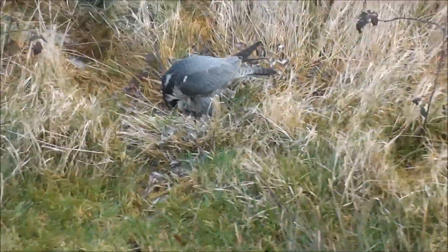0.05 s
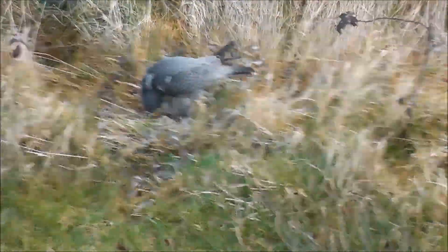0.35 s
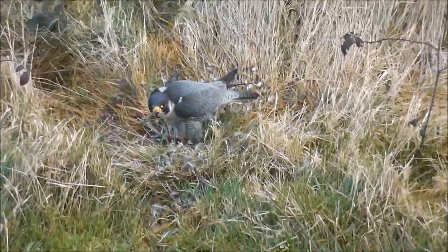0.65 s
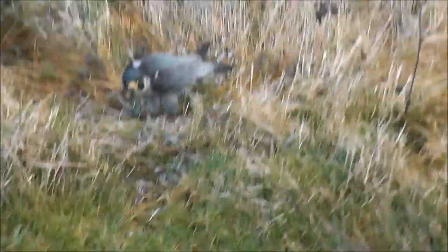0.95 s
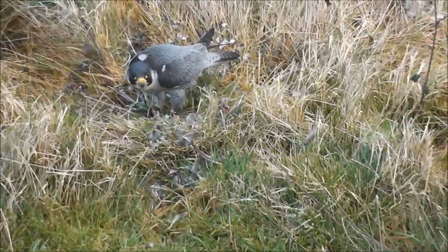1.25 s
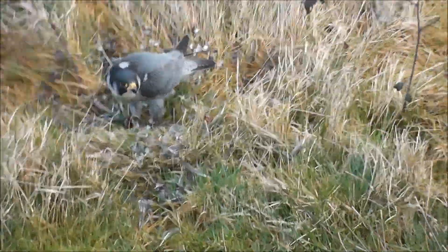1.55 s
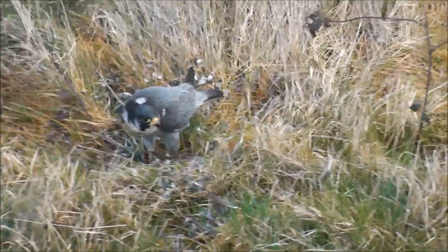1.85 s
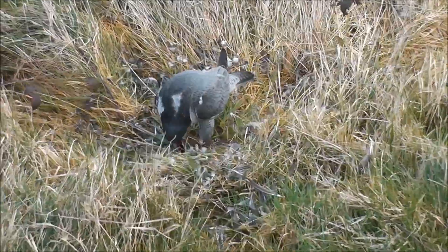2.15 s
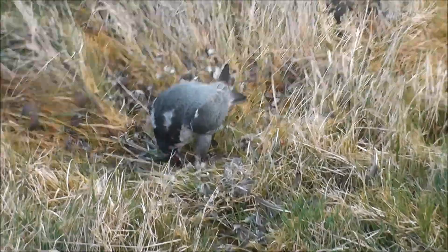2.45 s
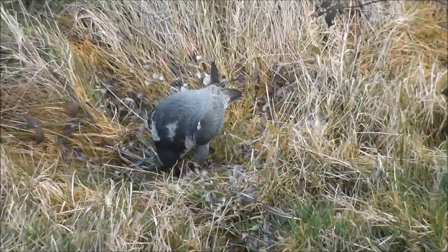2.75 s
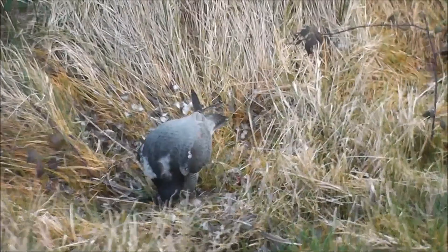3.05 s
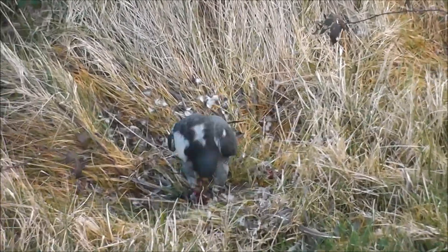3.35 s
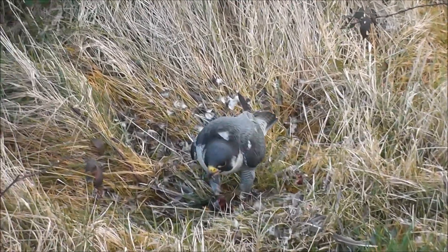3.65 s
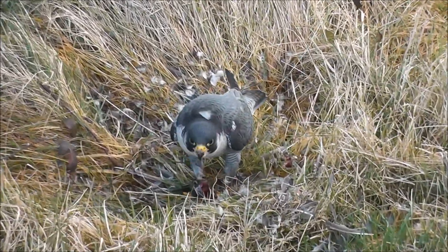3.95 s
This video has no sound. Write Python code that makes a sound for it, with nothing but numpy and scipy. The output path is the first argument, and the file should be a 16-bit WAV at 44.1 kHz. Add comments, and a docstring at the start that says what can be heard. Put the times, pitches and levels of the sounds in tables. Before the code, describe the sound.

Low wind buffets a hand-held microphone outdoors, with faint grass rustles. In a lull, a feeding falcon makes quiet snapping, tearing clicks and its little bell tinkles; then the wind pushes back in, thumping the microphone.

```python
"""Gusty wind buffets a hand-held microphone on a grassy slope, over the steady hiss of the open air.
From the first moments, soft swishes, probably grass or clothing, come at a slow walking pace, and a
falcon gives a stray dry snap and a tinkle of the little bell it wears. Just after 2 s the wind eases
and the bird plucks busily at its prey: fibres snap and tear, and the bell tinkles as it moves.
From about 3.3 s the gusts push back in, with a cluster of thumps near the end."""
import sys
import numpy as np
from scipy import signal
from scipy.fft import rfft, irfft
from scipy.io import wavfile
from scipy.ndimage import uniform_filter1d, minimum_filter1d

SR = 44100
rng = np.random.default_rng(int(sys.argv[2]) if len(sys.argv) > 2 else 0)


def pcm_store(signal):
    """Save signal as 16-bit PCM."""
    levels = np.round(np.clip(np.atleast_2d(signal), -1, 1) * 32767)
    wavfile.write(sys.argv[1], SR, levels.astype(np.int16).T)


N = 176400
T = np.arange(N) / SR

# Table levels are relative: each layer shapes and trims them further.
# fader ride of the open-air bed (time [s], level [dB])
AIR_RIDE = [(0, -45), (.35, -44.5), (.7, -42.5), (1.35, -42), (1.65, -38), (1.95, -38.5), (2.1, -40.5),
            (2.3, -39.5), (2.42, -36.5), (2.9, -38), (3.25, -35.5), (3.55, -39), (3.66, -41.5), (4, -44)]
# tone of the bed (frequency [Hz], level [dB])
AIR_EQ = [(200, -4.5), (600, 8.5), (1000, -6.5), (1300, -5.5), (1550, -7.5), (1930, 4), (2400, -9),
          (2900, -15), (3600, -21.5), (4400, -24), (5200, -18), (5800, -19), (6400, -26.5), (7400, -19),
          (8400, -27), (10000, -31), (12000, -34.5), (15500, -40)]
# stereo width of the bed (frequency [Hz], side over mid [dB])
AIR_WIDTH = [(300, -13), (1000, -8.5), (1900, -20), (2700, -3.5), (3500, 8.5), (4300, 1.5), (5300, -18.5),
             (7500, -7.5), (12000, -2.5)]
# the bed leans left (frequency [Hz], left over right [dB])
AIR_BALANCE = [(300, 5), (750, 2), (1130, 9.5), (1700, -0.5), (4000, 0.5)]
# faint narrow-band sounds: airy whistles and one brief scrape near 1.5 s
# (peak time [s], level [dB], half length [s], pitch [Hz])
NARROW_BAND_CUES = [(1.0, -63.5, 0.21, 3530), (1.474, -41, 0.024, 1870), (2.42, -35.5, 0.031, 2006),
                    (2.596, -55, 0.27, 3400)]
# soft brushing strokes (peak time [s], level [dB], rise [s], fall [s])
SWISH_CUES = [(.295, -48, 0.017, 0.018), (.385, -55, 0.013, 0.035), (.925, -46, 0.024, 0.033),
              (1.475, -47.5, .03, 0.096), (2.2, -42.5, 0.022, 0.04), (2.86, -44.5, 0.095, 0.1),
              (3.25, -52.5, 0.11, 0.15), (3.535, -40.5, 0.038, 0.034)]
# tone of the swishes (frequency [Hz], level [dB])
SWISH_EQ = [(600, -0.5), (1200, 9), (2000, 13), (3000, -3), (4300, -12), (5700, -4), (6500, -5.5),
            (7400, 3), (8100, -3.5), (8900, -4.5), (10000, -13.5), (11000, -20), (12000, -16.5),
            (13500, -21), (15500, -26.5)]
# stereo width of the swishes (frequency [Hz], side over mid [dB])
SWISH_WIDTH = [(1000, -3), (1900, -21.5), (2700, -10), (3500, 12.5), (4300, 9), (5300, -16), (7500, -8.5),
               (12000, 1)]
# modes of the bell's shell (frequency [Hz], level [dB], 60 dB decay time [s])
SHELL_MODES = [(3720, -16, 0.11), (7140, -3, 0.032), (7690, -13, .08), (10222, 0, 0.097), (10425, -18, .12),
               (10685, -23, .16)]
# clapper strikes (time [s], level [dB], low-mode boost [dB])
CLAPPER_CUES = [(.003, -59, 23), (.837, -43, 12.5), (1.36, -58, 0), (2.4608, -33.5, 5), (2.578, -56, -3),
                (2.6998, -36.5, -12), (2.759, -46, 12), (3.4223, -40.5, 11.5)]
# snaps of beak and dry stems
# (time [s], level [dB], body level [dB], body pitch [Hz], edge pitch [Hz], left over right [dB])
SNAP_CUES = [(0.5402, -34, 2, 1650, 6160, -5), (1.86, -47, 19, 1850, 3800, 1),
             (2.390, -23.5, 14, 1490, 4100, -1.5), (2.5327, -32, -6, 1650, 7450, -4),
             (2.723, -33.5, 6, 1750, 5600, 7), (2.8998, -34, -14, 1650, 7300, 1.5),
             (3.0216, -33, 10, 1400, 7500, 9), (3.114, -34, -10, 1650, 7700, 4),
             (3.133, -44, 27, 1080, 3500, 6), (3.154, -25.5, 2, 1680, 7250, 3),
             (3.3047, -28, 8.5, 1700, 10700, -5), (3.3656, -32, 8, 1650, 8500, -6),
             (3.377, -31.5, -3, 1650, 7500, 0)]
# single eddies thumping the microphone (time [s], level [dB], half length [s])
BUFFET_CUES = [(0.487, -6, 0.00063), (0.789, -8.5, 0.00086), (1.265, -6.5, 0.00098), (1.555, -13, 0.0014),
               (1.658, -6.5, .0009), (3.6253, 0, 0.00098), (3.659, 3, 0.0012), (3.6946, -2, 0.0013),
               (3.8406, -0.5, 0.0011)]
# gusts in the low rumble (time [s], level [dB])
RUMBLE_RIDE = [(0.0, -12.5), (0.11, -15.5), (0.19, -9), (0.29, -17), (0.4, -11), (0.59, -20.5), (0.61, -13),
               (0.88, -15.5), (0.93, -18), (1.0, -13), (1.08, -20.5), (1.14, -14), (1.6, -25.5),
               (1.66, -18.5), (1.99, -15.5), (2.04, -26), (2.26, -34), (2.39, -26.5), (2.44, -33.5),
               (2.48, -24), (2.55, -19.5), (2.58, -25), (3.02, -17.5), (3.13, -32.5), (3.2, -25.5),
               (3.23, -20.5), (3.25, -26), (3.29, -15.5), (3.38, -10.5), (3.41, -20), (3.58, -23.5),
               (3.63, -12.5), (3.7, -17.5), (3.72, -22), (3.84, -9.5), (3.87, -20.5), (3.91, -24.5),
               (3.95, -17.5), (4.0, -20.5)]
# tone of the rumble (frequency [Hz], level [dB])
RUMBLE_EQ = [(20, -45), (32, -37), (50, -11.5), (80, -3.5), (125, 1.5), (200, -1), (280, -5.5), (400, -13),
             (600, -22.5), (1000, -44), (2500, -83.5)]
# gusts in the brighter flutter (time [s], level [dB])
FLUTTER_RIDE = [(0.0, -17.5), (0.11, -14), (0.15, -17), (0.25, -17), (0.29, -19.5), (0.39, -21.5),
                (0.48, -17.5), (0.55, -24.5), (0.72, -19.5), (1.49, -36), (1.545, -28.5), (1.59, -45),
                (1.66, -26), (1.74, -24.5), (1.85, -24), (1.91, -30), (1.97, -23), (2.03, -46), (2.85, -36),
                (3.26, -47), (3.29, -22.5), (3.4, -23.5), (3.42, -34), (3.61, -28), (3.65, -24),
                (3.73, -34), (3.81, -23.5), (3.88, -36), (4.0, -31)]
# tone of the flutter (frequency [Hz], level [dB])
FLUTTER_EQ = [(120, -23.5), (250, -1.5), (420, 0.5), (560, -6), (760, -11), (1000, -21), (1400, -24),
              (2200, -35.5), (4000, -60.5), (11000, -74)]


def undb(db):
    """Decibels to gain."""
    return 10 ** (np.asarray(db) / 20)


def fader(ride):
    """Gain over time from (time [s], level [dB]) points."""
    return undb(np.interp(T, *np.array(ride).T))


def eq_curve(points):
    """Gain at every spectral bin from (frequency [Hz], level [dB]) points."""
    hz, db = np.array(points).T
    bin_hz = np.arange(N // 2 + 1) * SR / N
    return undb(np.interp(np.log(bin_hz + 1), np.log(hz), db))


def noise(eq):
    """Noise coloured by an EQ curve, rms 1."""
    x = irfft(rfft(rng.standard_normal(N)) * eq_curve(eq), N)
    return x / x.std()


def wander(rate_hz):
    """Smooth random modulation, standard deviation 1."""
    x = np.interp(T * rate_hz, np.arange(4096), rng.standard_normal(4096))
    return x / x.std()


def pan(db):
    """Stereo gains that put the left db above the right."""
    return undb(np.array([[db], [-db]]) / 2)


def mid_side(mid, side):
    """Left and right from mid and side."""
    return np.array([mid + side, mid - side])


def wide_noise(eq, width):
    """Stereo noise whose width changes with frequency."""
    mid = noise(eq)
    side = irfft(rfft(noise(eq)) * eq_curve(width), N)
    return mid_side(mid, side)


def ring(x, hz, q):
    """One resonance, gain 1 at its centre."""
    return signal.lfilter(*signal.iirpeak(hz, q, fs=SR), x)


def place(out, start_s, x):
    """Drop a short stereo sound onto the timeline."""
    i = int(start_s * SR)
    out[:, i:i + x.shape[1]] += x[:, :max(N - i, 0)]


def air():
    """The open-air bed: a wavering hiss with a nasal resonance near 2 kHz."""
    lean = np.sqrt(eq_curve(AIR_BALANCE))
    hiss = wide_noise(AIR_EQ, AIR_WIDTH)
    hiss = irfft(rfft(hiss) * np.array([lean, 1 / lean]), N)
    return hiss * fader(AIR_RIDE) * undb(3.0 + 1.77 * wander(rate_hz=24.56))


def whistles_and_scrape(q=8):
    """Narrow bands of hiss swell faintly and sink back: airy whistles and one brief scrape."""
    out = np.zeros(N)
    for at, db, half_s, hz in NARROW_BAND_CUES:
        band = ring(ring(rng.standard_normal(N), hz, q), hz, q)
        swell = np.exp(-((T - at) / half_s) ** 2 / 2)
        out += band / band.std() * undb(db) * swell
    return out


def swishes(trim_db=4.5, grain_db=3):
    """Fibres brush past each other: a grainy hiss that swells and fades."""
    swell = np.zeros(N)
    for at, db, rise_s, fall_s in SWISH_CUES:
        slope_s = np.where(T < at, rise_s, fall_s)
        swell += undb(db) * np.exp(-((T - at) / slope_s) ** 2 / 2)
    hiss = wide_noise(SWISH_EQ, SWISH_WIDTH)
    return hiss * swell * undb(trim_db + grain_db * wander(rate_hz=400)) * pan(1)


def bell(rattle_db=-19.5, rattle_top_db=16, rattle_gap_s=0.02, scatter_db=0.4, tick_db=-27, tick_s=.001):
    """A clapper hits a tiny shell: where it lands sets the low modes; its rattle favours the top."""
    out, t = np.zeros((2, N)), T[:SR // 4]
    for at, db, low_db in CLAPPER_CUES:
        for bounce in range(3):  # the strike, then two soft rebounds
            bounce_db, top_db = (rattle_db - 0.5 * bounce, rattle_top_db) if bounce else (0, 0)
            boosts_db = [low_db, low_db / 2, 0, 0, top_db, top_db]
            shell = np.zeros(len(t))
            for (hz, mode_db, t60), boost_db in zip(SHELL_MODES, boosts_db):
                gain = undb(mode_db + boost_db - scatter_db * rng.standard_normal())
                shell += gain * np.sin(2 * np.pi * hz * t) * undb(-60 * t / t60)
            tick = undb(tick_db) * rng.standard_normal(len(t)) * np.exp(-t / tick_s)
            place(out, at, undb(db + bounce_db) * (shell * pan(-7) + tick))
            at += rattle_gap_s * (1 + rng.random() / 2)
    return out


def snap(body_db, body_hz, edge_hz, attack_s=0.0007, grit_db=-4.5, crack_db=18.5, high_cut_hz=9800):
    """A fibre breaks: one sharp crack inside a short burst of grit, ringing three resonances."""
    t = T[:SR // 20]
    grit = rng.standard_normal(len(t)) * t / attack_s * np.exp(1 - t / attack_s)
    crack = signal.unit_impulse(len(t), int(attack_s * SR))
    burst = undb(grit_db) * grit + undb(crack_db) * crack
    body = 2 * undb(body_db) * ring(ring(burst, body_hz, q=1.6), body_hz, q=1.6)
    edge = ring(burst, edge_hz, q=4)
    sheen = undb(6.5) * ring(burst, hz=7500, q=26)
    return signal.sosfilt(signal.butter(2, high_cut_hz, fs=SR, output="sos"), body - edge - sheen)


def plucking(tear_from_s=2.3, tear_to_s=3.6, tick_count=26):
    """The falcon pulls at its prey: clear snaps, with tiny tearing ticks scattered between them."""
    out = np.zeros((2, N))
    for at, db, body_db, body_hz, edge_hz, pan_db in SNAP_CUES:
        place(out, at, undb(db) * snap(body_db, body_hz, edge_hz) * pan(pan_db))
    for when, softness, body, edge in rng.random(size=(tick_count, 4)):
        tick = snap(body_db=9, body_hz=1200 + 1100 * body, edge_hz=3500 + 5000 * edge)
        at = tear_from_s + when * (tear_to_s - tear_from_s)
        db = -43 - 2 * np.log(softness + .05)  # mostly faint, a few poke out
        place(out, at, undb(db) * tick * pan(0))
    return out


def buffets(low_cut_hz=104):
    """Each hard eddy thumps the microphone with one swing of suction and pressure."""
    out = np.zeros(N)
    for at, db, half_s in BUFFET_CUES:
        swing = (T - at) / half_s
        out += undb(db) * swing * np.exp((1 - swing ** 2) / 2)
    return signal.sosfilt(signal.butter(2, low_cut_hz, "high", fs=SR, output="sos"), out)


def turbulence(eq, side_db, eddy_db):
    """Pressure noise at the microphone's two ports, broken up by passing eddies."""
    eddies = undb(eddy_db * wander(rate_hz=95))
    pressure = mid_side(noise(eq), undb(side_db) * noise(eq))
    return pressure * eddies / np.sqrt(np.mean(eddies ** 2))


def wind(rumble_trim_db=-0.17, flutter_trim_db=0.5):
    """Large eddies hit both ports for a centred rumble; small ones hit each for a wide flutter."""
    rumble = turbulence(RUMBLE_EQ, side_db=-14.5, eddy_db=0.95) * fader(RUMBLE_RIDE)
    flutter = turbulence(FLUTTER_EQ, side_db=-3, eddy_db=2) * fader(FLUTTER_RIDE)
    return rumble * undb(rumble_trim_db) * pan(0.5) + flutter * undb(flutter_trim_db) * pan(3.5)


def scene():
    """The mix: wind up front, the air bed and the small sounds behind it."""
    return wind() + buffets() + air() + whistles_and_scrape() + swishes() + bell() + plucking()


def record(dry):
    """Master chain: a limiter holds the peaks at full scale, then a steep high cut."""
    window_samples, high_cut_hz = 441, 15800
    safe_gain = 1 / np.maximum(np.abs(dry).max(axis=0), 1)
    gain = uniform_filter1d(minimum_filter1d(safe_gain, window_samples), window_samples)
    return signal.sosfilt(signal.ellip(8, .2, 70, high_cut_hz, fs=SR, output="sos"), dry * gain)


dry = scene()
out = record(dry)
pcm_store(out)
```